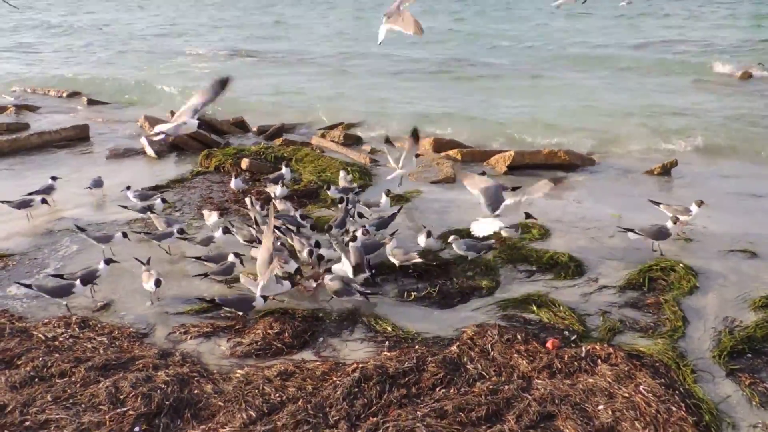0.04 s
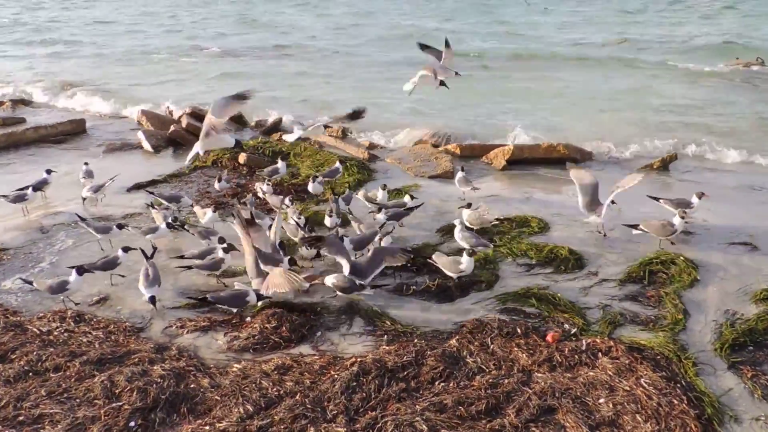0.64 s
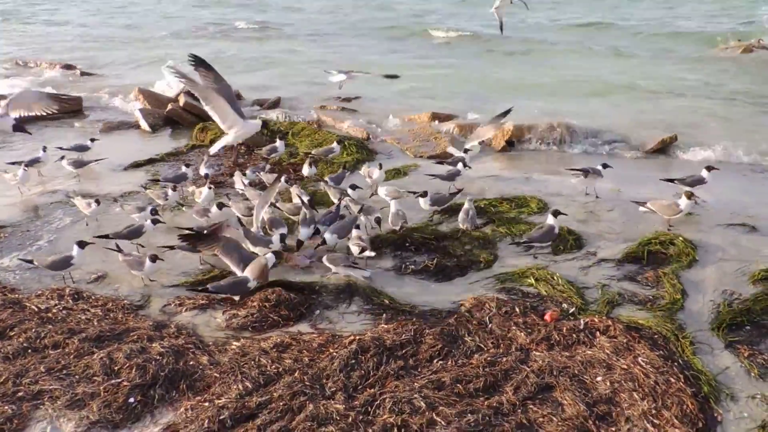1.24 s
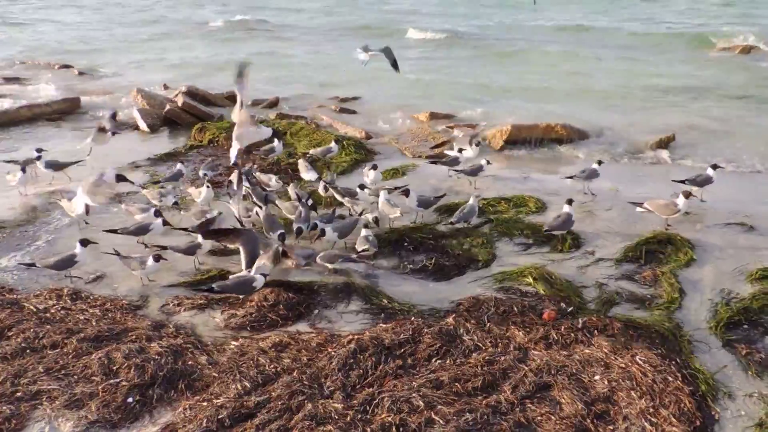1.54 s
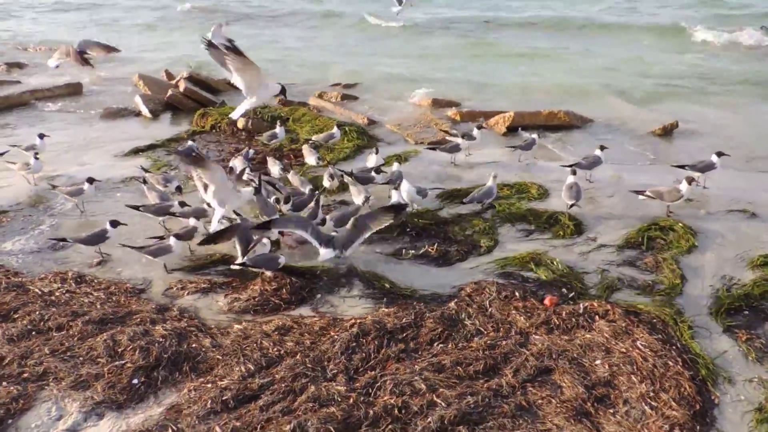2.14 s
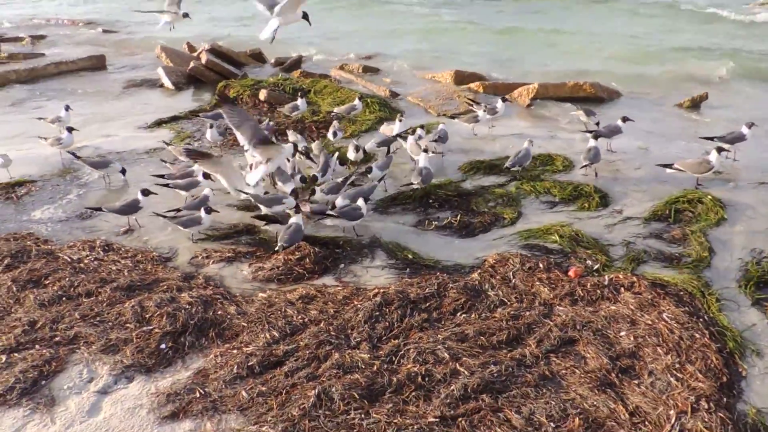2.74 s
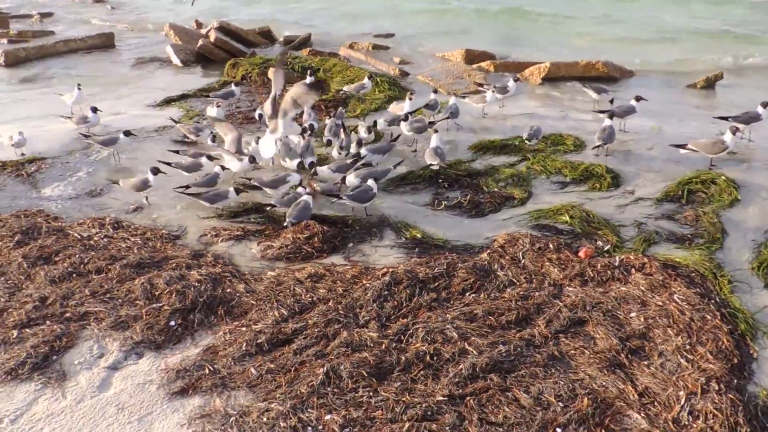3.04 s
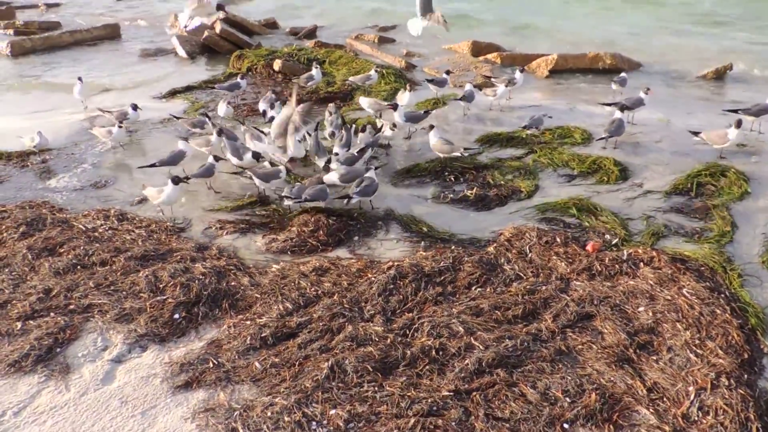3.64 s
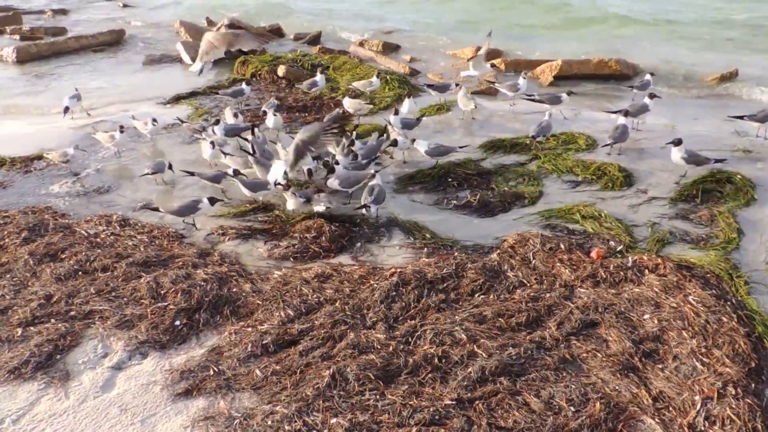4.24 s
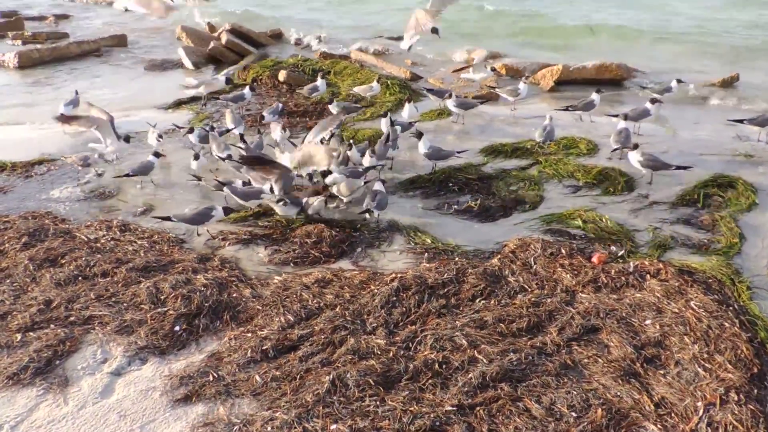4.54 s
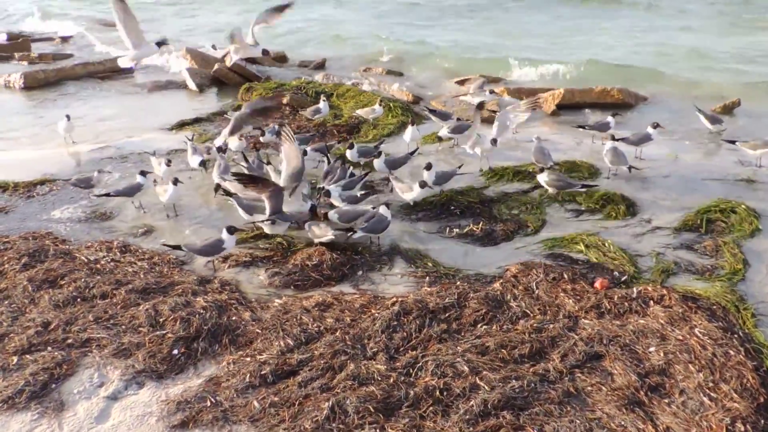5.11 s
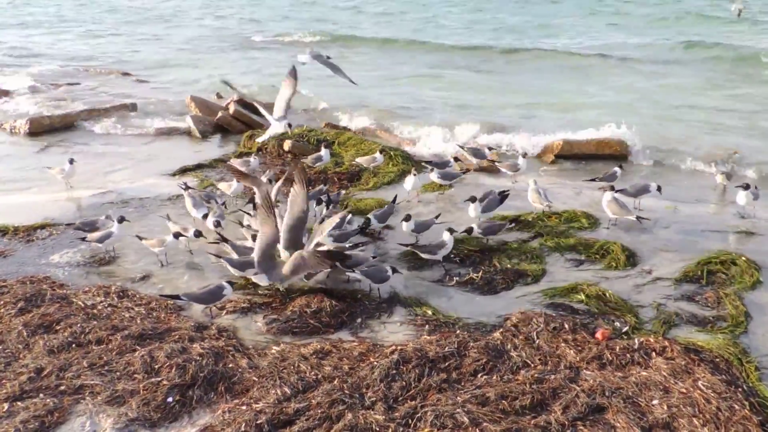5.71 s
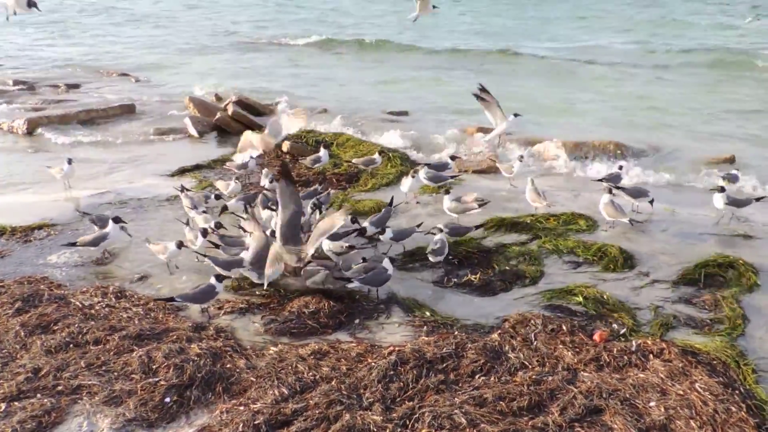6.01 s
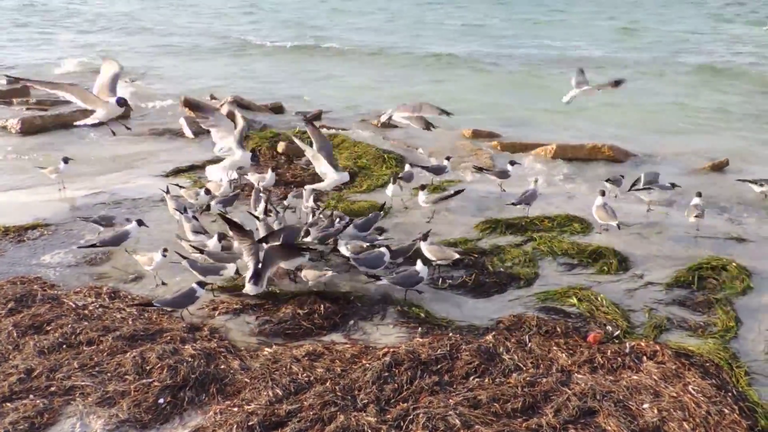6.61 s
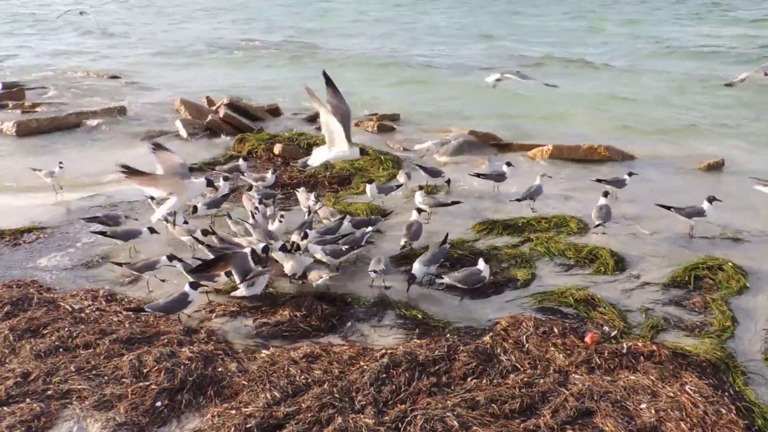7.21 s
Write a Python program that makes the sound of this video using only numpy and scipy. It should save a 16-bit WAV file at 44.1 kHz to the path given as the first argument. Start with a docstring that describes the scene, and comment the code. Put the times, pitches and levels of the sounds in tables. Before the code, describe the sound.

Short, harsh yelps from a flock of gulls come in bursts close by, with more distant birds behind and a few thin whistles and dry clicks mixed in. Gentle surf swells and hisses away, early on and again in the second half. Low wind buffets the outdoor microphone, hardest a little before the middle, when both birds and waves are quieter. The squabbling is thickest just after that and returns once more at the end.

```python
"""Gulls squabbling at the waterline

Gulls fight over food a few metres away, above a far chatter. Each short cry is an arch of pitch,
its harmonics shaped by throat, open bill and a bounce off wet sand; thin whistles and ticks mix in.
Small waves tumble, splash and fizz out as bands of noise with ringing drops.
Gusts buffet the microphone ports, mostly the right one."""
import sys
import numpy as np
from scipy import signal
from scipy.io import wavfile

SR = 44100
rng = np.random.default_rng(int(sys.argv[2]) if len(sys.argv) > 2 else 0)


def unload_wav(signal):
    """Save mono or channel-first audio to the path in sys.argv[1] as 16-bit WAV at rate SR, clipped to [-1, 1]."""
    wavfile.write(
        sys.argv[1],
        SR,
        np.round(np.clip(np.atleast_2d(signal).T, -1, 1) * 32767).astype(np.int16),
    )


N = 328986

# near cries: (start [s], end [s], top pitch [Hz], place of the top [0-1], pitch sag [Np/length^2],
# level [dB], tilt [dB/oct], bill resonance [Hz], sand bounce delay [s], roughness [0-1])
NEAR_CRIES = [(0.038, 0.127, 1025.0, 0.22, 0.49, -24, -3.5, 2400, 0.00097, 0.38),
              (0.127, 0.251, 1023.0, 0.99, 0.32, -25.5, -7.7, 3100.0, 0.00042, 0.24),
              (0.182, 0.267, 672.0, 0.46, 0.79, -23.5, -4.5, 2650, 0.00031, 0.2),
              (0.4, 0.451, 692.0, 0.63, 0.31, -29, -5.5, 4700.0, 0.00062, 0.46),
              (0.622, 0.693, 701.0, 0.36, 0.7, -25.0, -0.7, 2700.0, 0.00033, 0.3),
              (0.938, 1.006, 713.0, 0.45, 0.99, -26, -2.5, 4250.0, 0.00032, 0.3),
              (1.055, 1.142, 743.0, 0.47, 1.2, -26.5, 1.7, 2330.0, 0.00044, 0.17),
              (1.19, 1.231, 804.0, 0.59, 0.43, -18.4, -11.5, 4500, 0.00021, 0.3),
              (1.211, 1.332, 913.0, 0.46, 0.44, -25.5, -1.7, 3640, 0.00114, 0.18),
              (1.516, 1.556, 981.0, 0.71, 0.97, -32.4, -5, 1540.0, 0.0015, 0.2),
              (1.587, 1.611, 828.0, 0.96, 0.4, -17.5, -2, 4870.0, 0.0014, 0.4),
              (1.595, 1.642, 952.0, 0.02, 0.29, -17, 0.2, 3680.0, 0.00063, 0.18),
              (1.654, 1.731, 861.0, 1.0, 0.49, -26, -10, 3400.0, 0.00072, 0.2),
              (1.707, 1.828, 926, 0.5, 1.25, -22.5, 2.5, 3230.0, 0.00065, 0.2),
              (1.868, 1.929, 929, 0.47, 0.46, -27, 4, 2740, 0.00039, 0.05),
              (1.974, 2.039, 879.0, 0.95, 0.26, -19.5, 2.4, 3500, 0.00072, 0.16),
              (2.01, 2.1, 974.0, 0.45, 0.83, -18, -0.4, 6100, 0.00071, 0.03),
              (2.156, 2.27, 891.0, 1.0, 0.44, -26.5, -4.5, 6600, 0.00023, 0.29),
              (2.435, 2.482, 1007.0, 0.28, 0.41, -29.5, -4.5, 3900, 0.00099, 0.24),
              (2.467, 2.548, 964.0, 0.84, 0.05, -34, -5, 4160.0, 0.00052, 0.4),
              (2.574, 2.653, 995, 0.47, 0.51, -32.1, -4.5, 5040, 0.00095, 0.37),
              (2.632, 2.734, 860, 0.54, 0.25, -37.5, -6.5, 5240.0, 0.00065, 0.15),
              (2.904, 2.964, 762.0, 1.0, 0.43, -38, -2, 1590, 0.00084, 0.5),
              (2.923, 3.086, 892, 0.5, 0.097, -33, -2.5, 1930, 0.00071, 0.14),
              (3.316, 3.58, 689.0, 0.7, 0.49, -40, -2.5, 3120, 0.00057, 0.12),
              (3.549, 3.641, 702, 0.5, 0.55, -32, 0.2, 2120, 0.00035, 0.4),
              (3.642, 3.771, 962.0, 0.95, 0.45, -34, 0.5, 3400, 0.00048, 0.25),
              (3.737, 3.797, 718.0, 0.57, 0.49, -28.7, -0.5, 2900.0, 0.00029, 0.34),
              (3.756, 3.832, 848, 0.35, 0.17, -26, 0, 3700, 0.00062, 0.28),
              (3.794, 3.889, 777.0, 0.41, 0.32, -28, -3.5, 2360.0, 0.0015, 0.3),
              (3.95, 4.042, 729.0, 0.5, 0.81, -25, 2.3, 2900, 0.00031, 0.25),
              (4.066, 4.168, 707, 0.52, 0.1, -35.5, 5.5, 2400, 0.00046, 0.13),
              (4.213, 4.274, 819, 0.18, 0.38, -24, -0.5, 2800, 0.00123, 0.4),
              (4.252, 4.363, 861.0, 1.0, 0.16, -23.5, 0, 3160, 0.00071, 0.2),
              (4.302, 4.368, 779.0, 1.0, 0.21, -25, -2, 2940, 0.00038, 0.34),
              (4.339, 4.502, 774.0, 0.16, 0.19, -23, 0.5, 3070, 0.00065, 0.17),
              (4.428, 4.521, 759, 0.48, 0.12, -22.5, -6, 2290, 0.00091, 0.37),
              (4.482, 4.609, 978.0, 0.03, 0.1, -17.5, -4, 6000, 0.00049, 0.24),
              (4.562, 4.597, 926.0, 0.6, 0.94, -27, 0, 1990, 0.00048, 0.45),
              (4.617, 4.758, 893, 0.58, 0.3, -19, -1.0, 3850, 0.00061, 0.24),
              (4.734, 4.768, 700.0, 0.51, 0.55, -29, -0.5, 1650.0, 0.00194, 0.5),
              (4.917, 4.976, 738.0, 0.94, 0.35, -22.5, -0.5, 3260.0, 0.00083, 0.45),
              (4.95, 5.112, 933.0, 0.44, 0.096, -19.5, 0.0, 3970, 0.00059, 0.22),
              (5.879, 5.947, 724.0, 0.43, 0.94, -26.5, 2.3, 2260, 0.00047, 0.1),
              (5.911, 5.973, 800, 0.48, 1.08, -22, -2.2, 3100, 0.00032, 0.04),
              (6.044, 6.085, 798.0, 0.54, 0.58, -29.5, -4.0, 1440, 0.00041, 0.2),
              (6.193, 6.248, 801.0, 0.91, 0.17, -28.0, 1, 1690.0, 0.00082, 0.46),
              (6.221, 6.301, 842, 0.62, 0.96, -16.5, -3.5, 6270, 0.00093, 0.48),
              (6.308, 6.431, 723, 0.48, 0.74, -34, 2.5, 1470, 0.00076, 0.04),
              (6.648, 6.706, 907, 0.57, 0.45, -30.5, 2.5, 2500, 0.001, 0.44),
              (6.744, 6.828, 912.0, 0.56, 0.73, -20.5, -1.5, 3700, 0.00034, 0.37),
              (6.939, 7.025, 1181.0, 0.08, 0.33, -16.5, -2.0, 2450, 0.00032, 0.48),
              (7.003, 7.184, 1016.0, 0.53, 0.76, -23, -4.5, 3670, 0.00103, 0.27),
              (7.109, 7.214, 952.0, 0.42, 0.45, -27.5, -4, 3100, 0.00041, 0.56),
              (7.395, 7.468, 909.0, 0.3, 0.5, -35, 0.1, 2310.0, 0.00069, 0.4)]
# throat response of all gulls: (frequency [Hz], gain [dB])
THROAT_RESPONSE = [(600, -13), (950, -21), (1300, -5), (1750, 0), (2300, -9), (2700, -10.5), (3500, -7.5),
                   (4500, -8.5), (5700, -9.5), (6800, -16.5), (8200, -18), (10500, -19.5), (13000, -22.5),
                   (15000, -26)]
# flock at the two ports: (frequency [Hz], left minus right [dB], left lead [rad])
FLOCK_IMAGE = [(1400, 2.5, 0.17), (1900, 1, 0.2), (2560, -6, 0.42), (3660, 0.5, 1.6), (4700, 5.5, 1.43),
               (5700, 3, 0.66), (7360, 2, 0.97), (11100, 4, 0.73)]
# single-partial calls: (start [s], end [s], first [Hz], middle [Hz], last [Hz], level [dB])
WHISTLE_NOTES = [(4.76, 4.9, 3720, 4133, 4000, -33), (5.23, 5.40, 2400, 2200, 1100, -38.5),
                 (5.3, 5.41, 5150, 5100, 4950, -33.5)]
# snaps among the birds: (time [s], peak [dB])
TICK_PEAKS = [(1.841, -9), (2.849, -21), (7.353, -10)]
# far flock: (time [s], level [dB])
CHATTER_LEVEL = [(0, -49), (1.9, -31), (2.3, -85), (3.3, -44), (3.9, -34.5), (4.5, -36), (4.85, -31.5),
                 (5.3, -45), (6.6, -38), (7.46, -64.5)]
# surf level; rises and falls with the waves, and sinks for a while during the strongest gusts:
# (peak time [s], rise [dB/s], fall [dB/s], tumble level [dB], foam level [dB])
SURF_PEAKS = [(.08, 23, 15, -37.5, -39), (.5, 21, 12, -37, -33), (.98, 17, 18.5, -28, -26.5),
              (1.6, 19, 20.5, -32, -31), (4.45, 21, 19, -29.5, -28), (5.83, 16.5, 19, -25.5, -23.5),
              (6.85, 14, 17.5, -38.5, -40.5), (7.5, 26, 22, -42, -44)]
# tumbling water, splash, foam: (frequency [Hz], density [dB])
TUMBLE_SPECTRUM = [(90, -20.5), (170, -7.5), (260, -5), (380, -8.5), (580, 1.5), (720, -2), (900, -6.5),
                   (1400, -3), (2000, -15.5), (3500, -55)]
SPLASH_SPECTRUM = [(700, -8), (1400, 1.5), (2000, 5), (3000, 3), (4500, -2.5), (6500, -29), (11000, -60)]
FIZZ_SPECTRUM = [(2500, -9), (5000, 1.5), (7000, 1.5), (10000, 0), (12500, 4), (15000, -12)]
# surf at the two ports: (frequency [Hz], correlation [-1 to 1], left minus right [dB])
SURF_STEREO = [(200, 1, -2.5), (700, 0.94, -2), (1420, 0.7, -0.5), (2270, 0.42, -1.5), (3400, -0.079, 1),
               (5000, -0.12, 3.5), (8000, -0.046, 0), (14000, -0.11, 3.5)]
# gusts: (peak time [s], length [s], level [dB])
WIND_GUSTS = [(0.373, .19, -24), (0.849, 0.14, -18), (1.883, 0.051, -28), (2.243, 0.18, -13),
              (2.411, 0.16, -13.5), (2.906, 0.24, -22.5), (3.02, 0.08, -13), (3.163, 0.25, -26),
              (3.624, .05, -32), (3.854, 0.55, -33.5), (4.693, 0.38, -28), (5.146, 0.28, -22.5),
              (5.45, 0.08, -26.5), (5.93, 0.067, -32), (7.3, .1, -40)]
# breeze between gusts: (time [s], level [dB])
BREEZE_LEVEL = [(0, -39), (.6, -37), (1.4, -45.5), (2.0, -34.5), (2.6, -34), (3.4, -40), (4.2, -39),
                (5.5, -36.5), (6.1, -43.5), (7.1, -50.5), (7.46, -47)]
# eddies at a port: (frequency [Hz], density [dB])
BUFFET_SPECTRUM = [(20, 2), (45, -4), (90, -3), (150, -8.5), (250, -16.5), (450, -29), (900, -45),
                   (2500, -81)]

SIDE = np.array([[.5], [-.5]])  # splits a left-minus-right difference


def near_gulls(gain_db=0.78):
    """Birds fighting over the food."""
    out = np.zeros((2, N))
    for start_s, end_s, *shape in NEAR_CRIES:
        add(out, start_s, cry(end_s - start_s, *shape))
    return from_db(gain_db) * out


def cry(length_s, top_hz, crest, sag, level_db, tilt_db_per_oct, bill_hz, bounce_s, rough,
        jitter=0.0033, rattle=0.032, waver_db=2.5, bounce_gain=0.48, tiring_db=4, effort_db_per_np=5):
    """Harmonics on an arch of pitch: raspiest at both ends, softer as the pitch sags."""
    size = int(length_s * SR)
    u = np.linspace(0, 1, size)
    droop_np = sag * (u - crest) ** 2 * np.where(u > crest, 1.4, 1)  # falls faster than it climbs
    pitch_hz = top_hz * np.exp(-droop_np)
    rasp = rough + 0.42 * (1 - fade(u, 0.26))
    wobble = 1 + jitter * drift(169, size) + rattle * rasp * drift(1479, size)
    phase = 2 * np.pi * np.cumsum(pitch_hz * wobble) / SR
    out = np.zeros((2, size))
    for k in range(1, 22):
        hz = k * pitch_hz
        pan_db, lead_rad = at_hz(FLOCK_IMAGE, hz)
        tone = np.exp(1j * (k * phase + 2 * np.pi * rng.random()))
        tone *= 1 + rasp * (drift(693.7, size) + 1j * drift(700, size)) / np.sqrt(2)
        tone *= from_db(waver_db * drift(46, size))
        tone *= 1 + bounce_gain * np.exp(-2j * np.pi * hz * bounce_s)  # comb from the wet sand
        gain = from_db(voice_db(hz, tilt_db_per_oct, bill_hz) + SIDE * pan_db) * (hz < SR / 2)
        out += gain * np.real(tone * np.exp(1j * SIDE * lead_rad))
    out += throat_hiss(size) * np.sqrt(rasp / rasp.mean()) * out.std()
    gate = fade(u, np.where(u < .5, 0.29, 0.24))
    envelope_db = level_db - tiring_db * (u - .5) - effort_db_per_np * droop_np
    return np.sqrt(2) * out * gate * from_db(envelope_db)


def voice_db(hz, tilt_db_per_oct, bill_hz, bill_db=8.0, half_width_oct=0.18, knee_hz=1760, span_oct=1.9):
    """Level of a partial: throat response, tilt with effort, resonance of the open bill."""
    tilt_db = tilt_db_per_oct * np.clip(np.log2(hz / knee_hz), 0, span_oct)
    resonance_db = bill_db / (1 + (np.log2(hz / bill_hz) / half_width_oct) ** 2)
    return at_hz(THROAT_RESPONSE, hz)[0] + tilt_db + resonance_db


def throat_hiss(size, level_db=-21, band_hz=(2500, 12000)):
    """Air rushing through the open bill."""
    bandpass = signal.butter(1, band_hz, "band", fs=SR, output="sos")
    return from_db(level_db) * unit_rms(signal.sosfilt(bandpass, rng.standard_normal((2, size))))


def whistles(jitter=0.0043):
    """Thin calls of which one wavering partial carries."""
    out = np.zeros((2, N))
    for start_s, end_s, *points_hz, level_db in WHISTLE_NOTES:
        u = np.linspace(0, 1, int((end_s - start_s) * SR))
        parabola = np.polyfit([0, .5, 1], points_hz, 2)
        hz = np.polyval(parabola, u) * (1 + jitter * drift(210, len(u)))
        _, lead_rad = at_hz(FLOCK_IMAGE, hz)
        tone = np.sin(2 * np.pi * np.cumsum(hz) / SR + SIDE * lead_rad)
        add(out, start_s, np.sqrt(2) * from_db(level_db) * fade(u, 0.1) * tone)
    return out


def ticks(t60_s=0.009):
    """Dry, bright snaps, as of a bill closing."""
    out, t = np.zeros((2, N)), np.arange(SR // 50) / SR
    for start_s, peak_db in TICK_PEAKS:
        snap = np.diff(rng.standard_normal((2, len(t))) * from_db(-60 * t / t60_s))
        add(out, start_s, from_db(peak_db) * snap / np.abs(snap).max())
    return out


def far_gulls(rate_per_s=12, spread_db=2.0, gain_db=0.5):
    """Random yelps from the edge of the flock, dulled by distance."""
    out = np.zeros((2, N))
    flock_db = in_time(CHATTER_LEVEL)
    for i in np.flatnonzero(rng.random(N) < rate_per_s / SR):
        length_s, top_hz = rng.uniform(.057, .16), rng.uniform(660, 950)
        bill_hz, bounce_s = rng.uniform(2000, 3600), rng.uniform(.0003, .002)
        level_db = flock_db[i] + gain_db + rng.normal(0, spread_db)
        yelp = cry(length_s, top_hz, crest=.5, sag=.85, level_db=level_db, tilt_db_per_oct=-4.5,
                   bill_hz=bill_hz, bounce_s=bounce_s, rough=.25)
        add(out, i / SR, yelp)
    return out


def shore_scatter(x, gain_db=-17, t60_s=0.32, gap_s=.004, cutoff_hz=6000):
    """Short, dull, diffuse tail off rocks and weed."""
    t = np.arange(SR // 2) / SR
    tail = rng.standard_normal((2, len(t))) * from_db(-60 * t / t60_s) * (t > gap_s)
    tail /= np.sqrt(np.sum(tail ** 2) / 2)
    tail = signal.sosfilt(signal.butter(1, cutoff_hz, fs=SR, output="sos"), tail)
    return from_db(gain_db) * signal.fftconvolve(x, tail, axes=1)[:, :N]


def surf_envelopes(floor_db=-59.5, foam_lag_s=0.023):
    """Amplitudes of tumble and foam: a rise and fall around each peak, the foam slightly later."""
    t = np.arange(N) / SR
    tumble_power = foam_power = from_db(floor_db) ** 2
    for peak_s, rise_db_per_s, fall_db_per_s, tumble_db, foam_db in SURF_PEAKS:
        age_s = t - peak_s - np.array([[0], [foam_lag_s]])
        loss_db = np.maximum(-rise_db_per_s * age_s, fall_db_per_s * age_s)
        tumble_power = tumble_power + from_db(tumble_db - loss_db[0]) ** 2
        foam_power = foam_power + from_db(foam_db - loss_db[1]) ** 2
    return np.sqrt(tumble_power), np.sqrt(foam_power)


def surf(tumble, foam, tumble_db=6.0, splash_db=4.5, fizz_db=5.5, churn_db=2.5):
    """Low tumble, mid splash, high fizz; each band churns on its own."""
    layers = [(tumble * from_db(tumble_db), TUMBLE_SPECTRUM),
              (np.sqrt(tumble * foam) * from_db(splash_db), SPLASH_SPECTRUM),
              (foam * from_db(fizz_db), FIZZ_SPECTRUM)]
    out = np.zeros((2, N))
    spatter_db = drift(350) + 0.42 * drift(21)
    for hz, (mid, side) in noise_bands(90, 15500, count=22):
        gain = np.sqrt(sum((envelope * density(spectrum, hz)) ** 2 for envelope, spectrum in layers))
        flicker_db = churn_db * drift(45) * min(1, (900 / hz) ** 0.43) + spatter_db * min(1, hz / 5000)
        correlation, pan_db = at_hz(SURF_STEREO, hz)
        pair = np.sqrt((1 + correlation) / 2) * mid + np.sqrt((1 - correlation) / 2) * side * 2 * SIDE
        out += gain * from_db(flicker_db + SIDE * pan_db) * pair
    return out


def droplets(foam, rate_per_s=500, gain_db=-10, t60_cycles=12, pitches=14):
    """Drops and bubbles ringing briefly in the foam."""
    out = np.zeros((2, N))
    for hz in np.geomspace(900, 13000, pitches):
        hits = rng.integers(0, N, int(rate_per_s * N / SR / pitches))
        size_db = np.minimum(rng.exponential(1, len(hits)), 5)
        clicks = np.full(N, 1e-18)
        clicks[hits] = from_db(size_db) * rng.choice([-1, 1], len(hits))
        radius, step_rad = from_db(-60 * hz / (t60_cycles * SR)), 2 * np.pi * hz / SR
        ring = signal.lfilter([np.sin(step_rad)], [1, -2 * radius * np.cos(step_rad), radius ** 2], clicks)
        out += ring * from_db(rng.normal(0, 1.8, (2, 1))) * np.sqrt(hz)
    return foam * from_db(gain_db) * unit_rms(out)


def wind(gain_db=3.0, lumpy_db=4.0, flutter_db_per_oct=0.75, brighten_per_oct=0.13, pivot_db=-26):
    """Separate eddies at each port; the harder they blow, the higher the rumble reaches."""
    port_db = port_wind_db()
    excess_db = np.maximum(port_db - pivot_db, -8)
    flutter = np.array([drift(130), drift(130)])
    tilt_db_per_oct = brighten_per_oct * excess_db + flutter_db_per_oct * flutter
    out = np.zeros((2, N))
    for hz, band in noise_bands(18, 2400, count=10):
        octaves = np.clip(np.log2(hz / 120), 0, 2)
        out += density(BUFFET_SPECTRUM, hz) * band * from_db(octaves * tilt_db_per_oct)
    return from_db(port_db + gain_db + lumpy_db * np.array([drift(55), drift(55)])) * out


def port_wind_db(even_db=-54, lee_db_per_db=.45):
    """Bell-shaped gusts on a breeze; above even_db the left port lies increasingly in the lee."""
    t = np.arange(N) / SR
    gust_power = sum((from_db(peak_db) * np.exp(-(2 * (t - peak_s) / length_s) ** 2)) ** 2
                     for peak_s, length_s, peak_db in WIND_GUSTS)
    force_db = 10 * np.log10(from_db(in_time(BREEZE_LEVEL)) ** 2 + gust_power)
    share = from_db(-SIDE * lee_db_per_db * np.maximum(force_db - even_db, 0))
    return force_db + 20 * np.log10(share / np.sqrt(np.mean(share ** 2, axis=0)))


def from_db(db):
    """Decibels to gain."""
    return 10 ** (np.asarray(db) / 20)


def unit_rms(x):
    """Scale to unit power."""
    return x / np.sqrt(np.mean(x ** 2) + 1e-20)


def in_time(curve):
    """A (time, value) curve at every sample."""
    return np.interp(np.arange(N) / SR, *np.transpose(curve))


def at_hz(table, hz):
    """Value columns of a table, read on a log-frequency axis."""
    knots_hz, *columns = np.transpose(table)
    return [np.interp(np.log(hz), np.log(knots_hz), column) for column in columns]


def drift(rate_hz, size=N):
    """Interpolated noise of unit spread, rate_hz knots a second."""
    steps = np.arange(size) * rate_hz / SR + rng.random()
    knots = rng.standard_normal(int(steps[-1]) + 2)
    return np.interp(steps, np.arange(len(knots)), knots) * np.sqrt(3 / 2)


def fade(u, edge):
    """Soft rise and fall, each over the share `edge` of u = 0..1."""
    return np.sin(np.pi / 2 * np.clip(np.minimum(u, 1 - u) / edge, 0, 1)) ** 2


def add(out, start_s, sound):
    """Mix in a stereo sound."""
    i = int(start_s * SR)
    out[:, i:i + sound.shape[1]] += sound[:, :max(N - i, 0)]


def noise_bands(low_hz, high_hz, count):
    """Yield (centre [Hz], uncorrelated noise pair of unit power per Hz)."""
    edges_hz, white = np.geomspace(low_hz, high_hz, count + 1), rng.standard_normal((2, 2, N))
    for k, (low, high) in enumerate(zip(edges_hz, edges_hz[1:])):
        band = signal.sosfilt(signal.butter(2, [low, high], "band", fs=SR, output="sos"), white[k % 2])
        yield np.sqrt(low * high), np.sqrt(high - low) * unit_rms(band)


def density(spectrum, hz):
    """Gain per root Hz of a spectrum scaled to unit power; zero outside its range."""
    grid_hz = np.arange(10, 15000, 10)
    inside = (grid_hz >= spectrum[0][0]) & (grid_hz < spectrum[-1][0])
    shape = from_db(at_hz(spectrum, grid_hz)[0]) * inside
    return np.interp(hz, grid_hz, shape) / np.sqrt(10 * np.sum(shape ** 2))


def scene():
    """Gulls in front, surf behind, wind on the microphone."""
    tumble, foam = surf_envelopes()
    shore = surf(tumble, foam) + droplets(foam) + wind()
    near, far = near_gulls() + whistles() + ticks(), far_gulls()
    return near + far + shore_scatter(near + 2 * far) + shore


def record(dry, cutoff_hz=14400):
    """Clip at full scale, then low-pass steeply."""
    lowpass = signal.ellip(12, .2, 70, cutoff_hz, fs=SR, output="sos")
    return signal.sosfilt(lowpass, np.clip(dry, -1, 1))


dry = scene()
out = record(dry)
unload_wav(out)
```